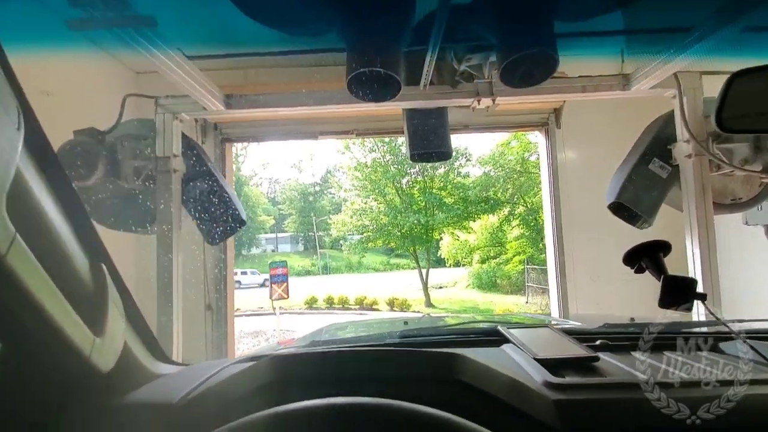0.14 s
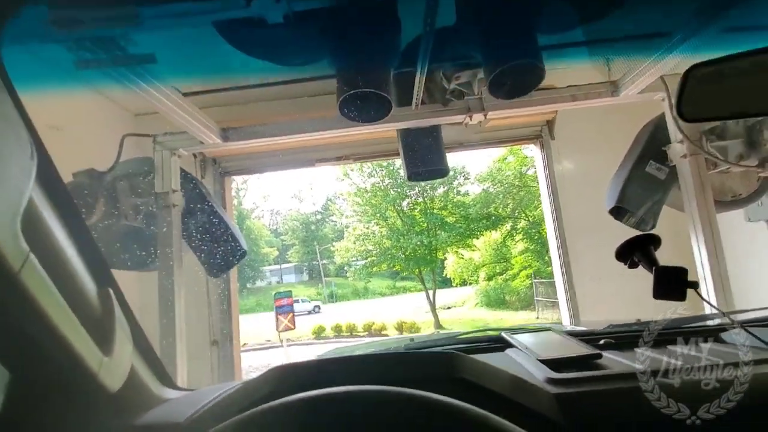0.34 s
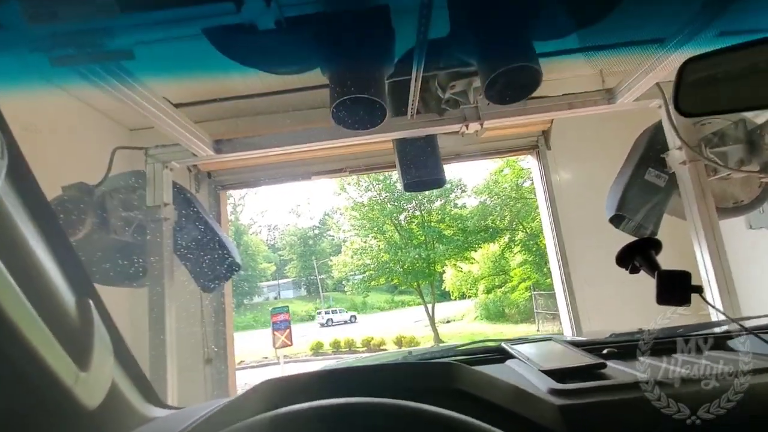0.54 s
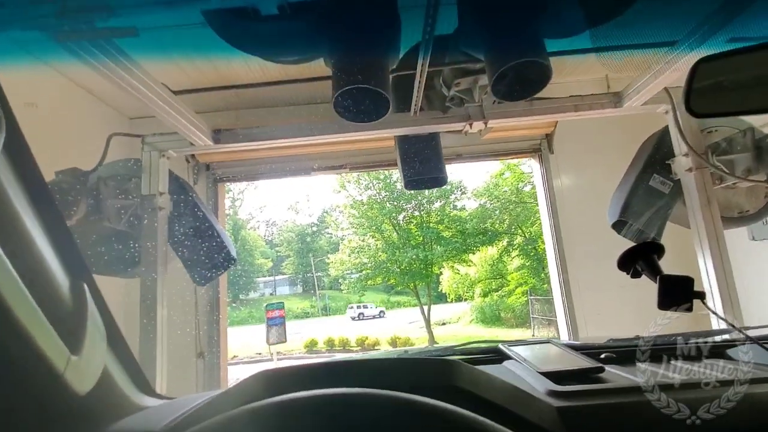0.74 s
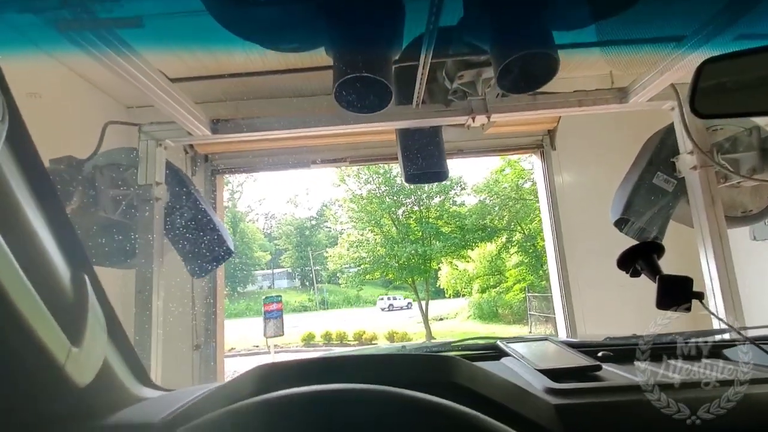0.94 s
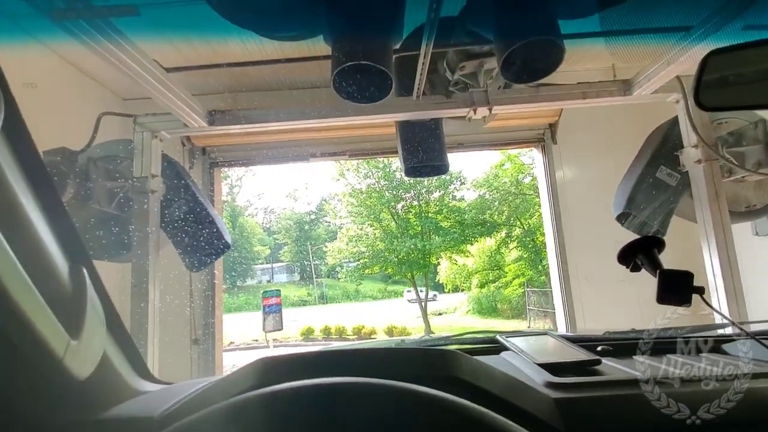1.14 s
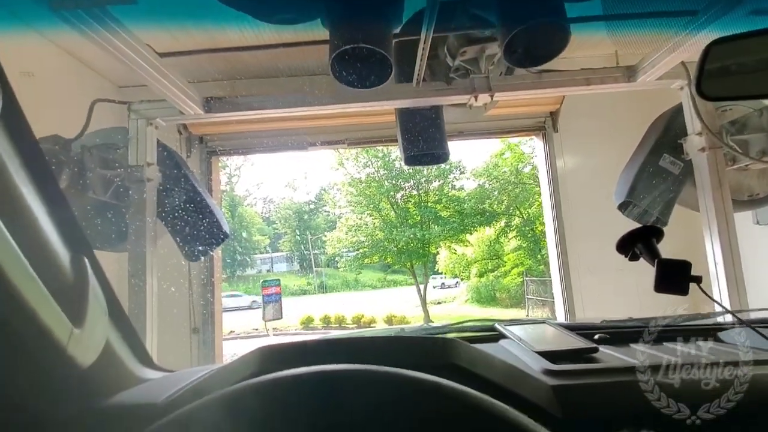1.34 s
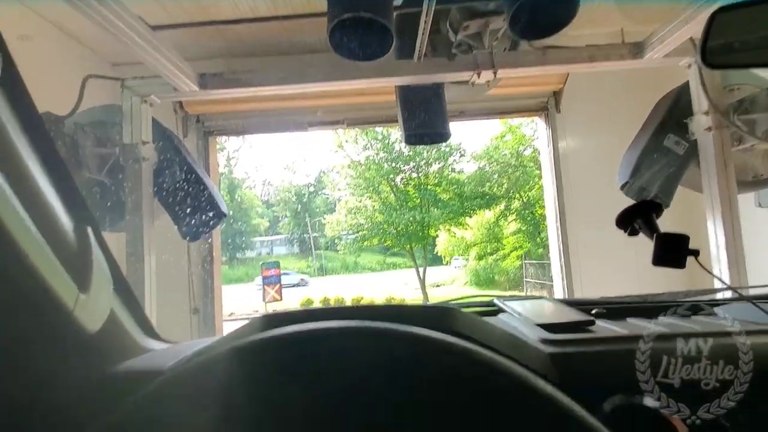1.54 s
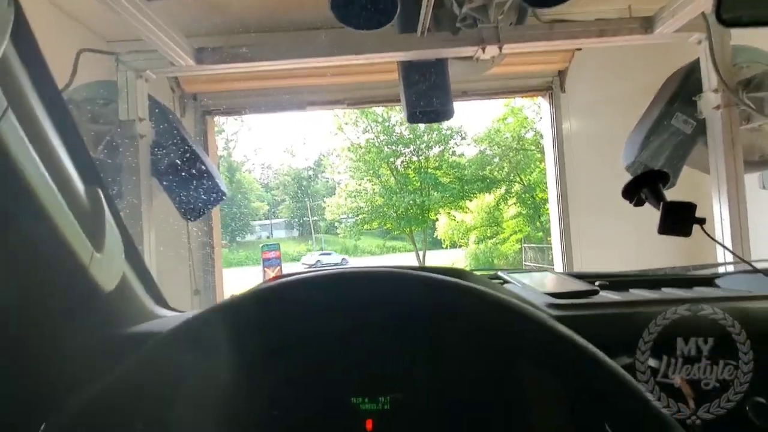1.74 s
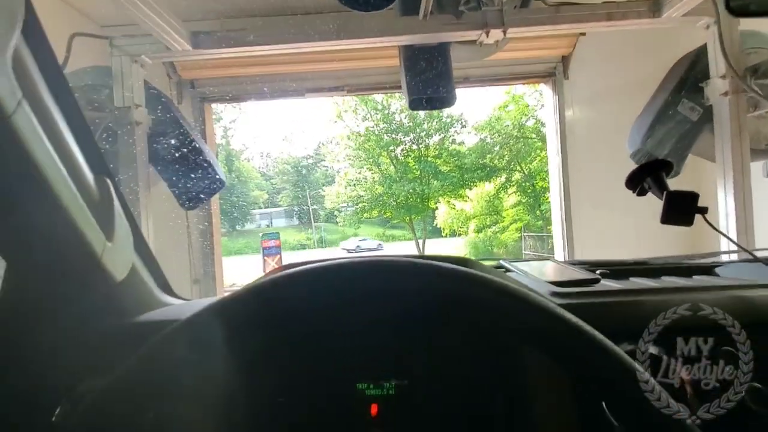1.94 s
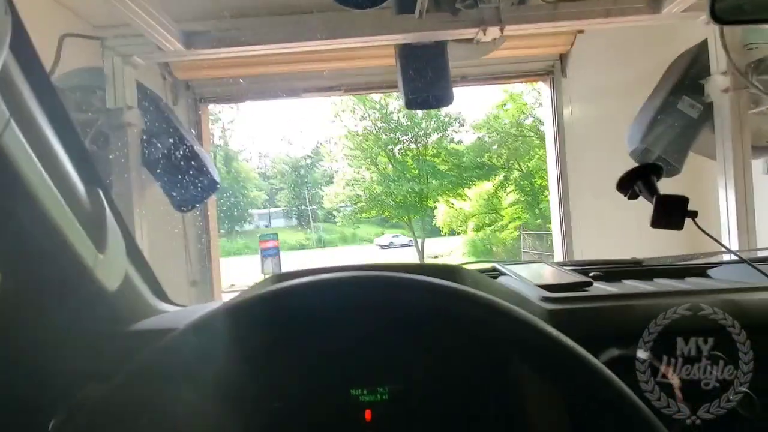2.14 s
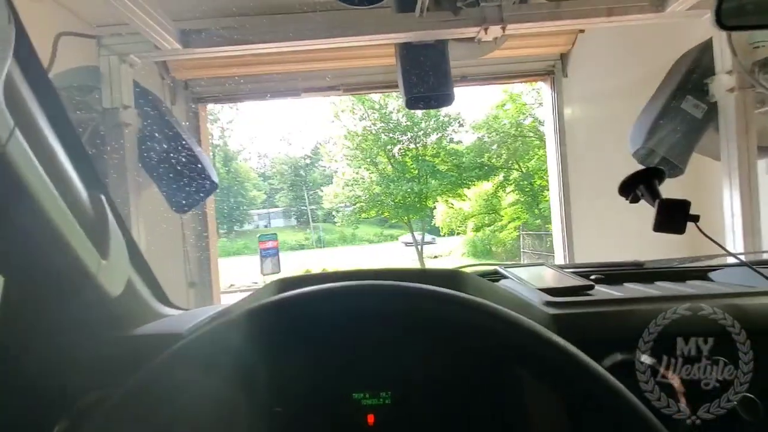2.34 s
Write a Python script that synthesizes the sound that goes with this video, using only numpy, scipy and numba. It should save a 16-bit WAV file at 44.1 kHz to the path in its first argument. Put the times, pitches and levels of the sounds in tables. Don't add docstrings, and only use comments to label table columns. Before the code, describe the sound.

Powerful car wash dryer blowers roar steadily, heard from the driver's seat of a closed car; low turbulent rumble shakes roof and doors, with muffled air hiss and a faint late whistle, on a close, slightly squashed phone microphone.

```python
import sys
import numpy as np
from scipy import signal
from scipy.fft import rfft, irfft
from scipy.io import wavfile
from scipy.ndimage import uniform_filter1d
from numba import njit

SR = 44100
rng = np.random.default_rng(int(sys.argv[2]) if len(sys.argv) > 2 else 0)


def undo_db(level):
    steps = np.asarray(level, float) / 20
    return 10 ** steps


def transcribe(signal):
    frames = np.atleast_2d(signal).T
    limited = np.clip(frames, -1, 1)
    pcm = np.round(limited * 32767).astype(np.int16)
    wavfile.write(sys.argv[1], SR, pcm)


N = 110250
TIME_S = np.arange(N) / SR
LEFT_RIGHT = np.array([[1.0], [-1.0]])


def level(x, db):
    return x * undo_db(db) / np.sqrt(np.mean(x ** 2))


def curve(table, col):
    rows = np.array(table, float)
    return np.interp(TIME_S, rows[:, 0], rows[:, col])


def walk(rate_hz):
    hold = int(SR / rate_hz)
    steps = np.repeat(rng.standard_normal(N // hold + 1), hold)
    slewed = uniform_filter1d(uniform_filter1d(steps, hold), hold)
    return 1.186 * slewed[:N]


def over_hz(points, hz):
    p = np.array(points, float)
    return np.interp(np.log(hz), np.log(p[:, 0]), p[:, 1])


def tone(pitch_hz):
    return np.sin(2 * np.pi * np.cumsum(pitch_hz) / SR)


def rush(points, swell):
    swell_db, flicker_db = -1, 1.16
    hz = np.fft.rfftfreq(N, 1 / SR) + 1
    octaves_below = np.maximum(np.log2(points[0][0] / hz), 0)
    octaves_above = np.maximum(np.log2(hz / points[-1][0]), 0)
    colour_db = over_hz(points, hz) - 30 * (octaves_below + octaves_above)
    spec = rfft(rng.standard_normal(N)) * undo_db(colour_db)
    out = np.zeros(N)
    for centre_oct in np.arange(4, 14.1, .5):
        share = np.clip(1 - 2 * abs(np.log2(hz) - centre_oct), 0, 1)
        out += irfft(spec * share, N) * undo_db(swell_db * swell + flicker_db * walk(9.99))
    return out


@njit
def svf(x, hz, width):
    y, band, low = np.empty(len(x)), 0., 0.
    for i in range(len(x)):
        g, k = np.tan(np.pi * hz[i] / SR), width / hz[i]
        v = (band + g * (x[i] - low)) / (1 + g * (g + k))
        band, low, y[i] = 2 * v - band, low + 2 * g * v, k * v
    return y


def ring(hz, width_hz):
    hz, width_hz = hz * np.ones(N), float(width_hz)
    once = svf(rng.standard_normal(N), hz, width_hz)
    return svf(once, hz, width_hz)


def modes(table):
    out = np.zeros(N)
    for hz, width_hz, db in table:
        drifting_hz = hz * (1 + 0.015 * walk(2.94))
        out += level(ring(drifting_hz, width_hz), db) * undo_db(2.5 * walk(2.5))
    return out


# time in seconds, load in dB, pitch in Hz.
ROOF_LOAD = [(0, 3, 160), (.24, 4, 172), (.38, -6, 165), (.55, 0, 160), (.67, 2, 173), (.85, -10, 160),
             (1.13, 1, 165), (1.3, -5, 148), (1.5, -8, 150), (1.65, 2, 132), (1.76, -3, 165),
             (1.87, 3, 150), (2.05, -8, 150), (2.17, 3, 162), (2.28, 6, 156), (2.36, 6, 146),
             (2.44, 2, 166), (2.5, 2, 150)]


def roof():
    roof_db, wobble_hz, flutter_db = -19, 5, 1.5
    drum = np.sqrt(2) * tone(curve(ROOF_LOAD, 2) + wobble_hz * walk(18))
    return drum * undo_db(roof_db + curve(ROOF_LOAD, 1) + flutter_db * walk(22))


# centre in seconds, length in seconds, level in dB, pitch in Hz, glide in Hz per second.
EDDIES = [(.5, .2, -19, 272, 0), (1.2, .16, -18, 350, -60), (1.3, .14, -21, 228, -60),
          (1.6, .14, -17, 380, -250), (1.82, .14, -20, 225, 100), (1.97, .12, -20, 300, 100),
          (2.3, .25, -19, 328, 30), (.52, .14, -16, 103, 0), (1.55, .25, -19, 92, 30),
          (.7, .1, -18, 105, 0), (.48, .14, -20, 62, 0)]


def eddies():
    wobble_hz = 7
    out = np.zeros(N)
    for centre_s, length_s, db, hz, glide in EDDIES:
        since_s = TIME_S - centre_s
        pitch_hz = hz + glide * np.clip(since_s, -length_s, length_s) + wobble_hz * walk(25)
        bell = np.exp(-8 * (since_s / length_s) ** 2)
        out += np.sqrt(2) * tone(pitch_hz) * undo_db(db) * bell
    return out


# time in seconds, panel load in dB, jet on glass in dB, jet on doors in dB.
CREEP = [
    (0, -5, -1, -9.5),
    (.4, -4.5, 0, -2.5),
    (.8, -1, 1, -1.5),
    (1.15, -0.5, 0.5, 0.5),
    (1.55, -3.5, -3.5, 1.5),
    (1.9, -3, -2, 3),
    (2.2, -2.5, -1, 1.5),
    (2.5, -3.5, -1, 5),
]
# frequency in Hz, density in dB per Hz.
PANELS = [(20, -39), (50, -14.5), (100, -4.5), (200, -5.5), (385, -10), (410, -14.5), (600, -20),
          (1300, -42.5)]
# frequency in Hz, density in dB per Hz.
ACROSS = [(18, -59), (30, -31.5), (75, -9.5), (118, -8), (215, -1), (264, -2.5), (650, -11), (749, -15.5),
          (1300, -22.5), (1690, -62.5), (2860, -120)]
# frequency in Hz, width in Hz, level in dB.
CABIN = [(55.2, 27, -31.5), (94, 17, -33), (141.4, 18, -26), (426.7, 14, -30.5), (486.2, 26, -33.5),
         (969.7, 47, -45)]
# frequency in Hz, width in Hz, level in dB.
CROSS = [(212, 12, -28), (362.5, 28, -37), (790, 32, -42)]
# frequency in Hz, width in Hz, level in dB.
DOORS = [(286.5, 39, -27.5), (326, 20, -27.5), (370, 29.4, -26.5)]


def boom(swell):
    doors = modes(DOORS) * undo_db(curve(CREEP, 3))
    mid = level(rush(PANELS, swell), -11.5) + modes(CABIN) + doors + roof() + eddies()
    side = level(rush(ACROSS, swell), -25) + modes(CROSS)
    return (mid + LEFT_RIGHT * side) * undo_db(curve(CREEP, 1))


# frequency in Hz, density in dB per Hz.
GLASS = [(900, -10.5), (1300, -1.5), (2300, -2), (4100, -9.5), (5300, -18), (6900, -22.5), (7700, -35),
         (9000, -59)]


def jets(swell):
    hiss = np.array([level(rush(GLASS, swell), -39) for _ in range(2)])
    return hiss * undo_db(curve(CREEP, 2))


# time in seconds, level in dB, pitch in Hz.
WHISTLE = [(0, -70, 1370), (1.84, -52, 1370), (1.89, -45, 1370), (1.94, -49, 1385), (2.0, -45, 1380),
           (2.035, -48, 1385), (2.06, -45, 1400), (2.11, -49, 1375), (2.19, -37, 1372), (2.25, -40, 1372),
           (2.29, -46, 1380), (2.34, -42, 1365), (2.38, -43, 1405), (2.43, -40, 1410), (2.5, -54, 1370)]


def edge_tone(pitch_ratio, flutter_rate_hz):
    wobble_hz, flutter_db = 20, 2.5
    hz = curve(WHISTLE, 2)
    sine = tone(pitch_ratio * hz + wobble_hz * walk(70)) * undo_db(flutter_db * walk(flutter_rate_hz))
    breath = level(ring(hz, 90), -3)
    spray = level(ring(1700, 450), -9)
    return sine + breath + spray


def whistle():
    lean_db, across = 3, .8
    lower, upper = edge_tone(1, 45), edge_tone(1.025, 49)
    both = lower + across * upper * LEFT_RIGHT
    return both * undo_db(curve(WHISTLE, 1) + lean_db / 2 * LEFT_RIGHT)


# start in seconds, level in dB, pitch in Hz.
TICK = [
    (1.695, -28, 945),
]


def tick():
    t60_s, rise_s = .16, .008
    out = np.zeros(N)
    for start_s, db, hz in TICK:
        t = np.maximum(TIME_S - start_s, 0)
        envelope = undo_db(db - 60 * t / t60_s) * (1 - np.exp(-t / rise_s))
        out += envelope * np.sin(2 * np.pi * hz * t)
    return np.array([.3 * out, out])


def scene():
    swell = walk(2.8)
    return boom(swell) + jets(swell) + whistle() + tick()


# frequency in Hz, left minus right in dB.
LEAN = [(60, 1.5), (97, -0.5), (160, 3), (250, -2.5), (410, 2.5), (660, 1), (1060, 1), (1720, -3),
        (2770, -2.5), (4480, 1)]


def ports(x):
    half_db = over_hz(LEAN, np.fft.rfftfreq(2 * N, 1 / SR) + 1) / 2
    mirrored = np.hstack([x, x[:, ::-1]])
    return irfft(rfft(mirrored) * undo_db(LEFT_RIGHT * half_db))[:, :N]


@njit
def follow(x, up, down):
    y, e = np.empty(len(x)), .3
    for i in range(len(x)):
        e += (x[i] - e) * (up if x[i] > e else down)
        y[i] = e
    return y


def limiter(x):
    limit_db, ratio, makeup_db = -8, 2.28, 2.5
    attack_s, release_s = 0.0036, 0.091
    softness = 0.68
    envelope = follow(abs(x).max(axis=0), 1 / (attack_s * SR), 1 / (release_s * SR))
    gain = np.minimum(undo_db(limit_db) / envelope, 1) ** (1 - 1 / ratio)
    return np.tanh(softness * x * gain * undo_db(makeup_db)) / softness


def preamp_hiss():
    hiss_db, alike, duck, flicker_db = -58.5, .1, .5, 0.7
    a, b = rng.standard_normal((2, N))
    hiss = np.array([a, alike * a + np.sqrt(1 - alike ** 2) * b]) * undo_db(hiss_db + LEFT_RIGHT)
    return hiss * undo_db(duck * (curve(CREEP, 2) - curve(CREEP, 1)) + flicker_db * walk(5.5))


def top_cut(x):
    return signal.sosfilt(signal.butter(12, 15750, fs=SR, output="sos"), x)


def record(dry):
    mix = limiter(ports(dry)) + preamp_hiss()
    return top_cut(mix)


dry = scene()
out = record(dry)
transcribe(out)
```